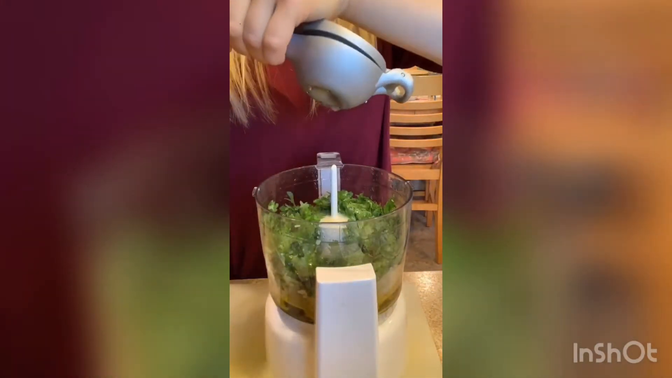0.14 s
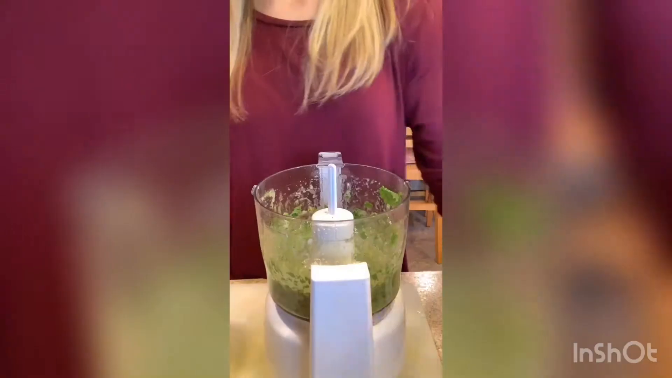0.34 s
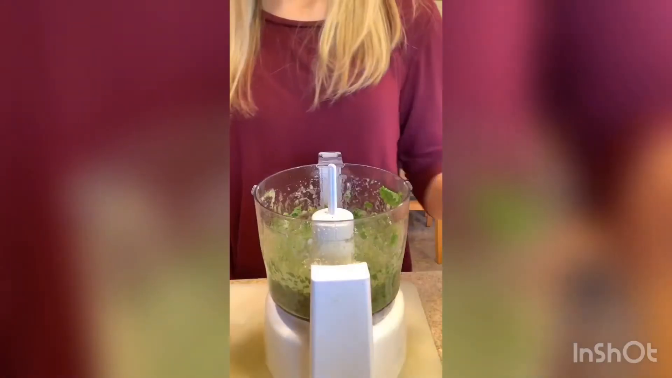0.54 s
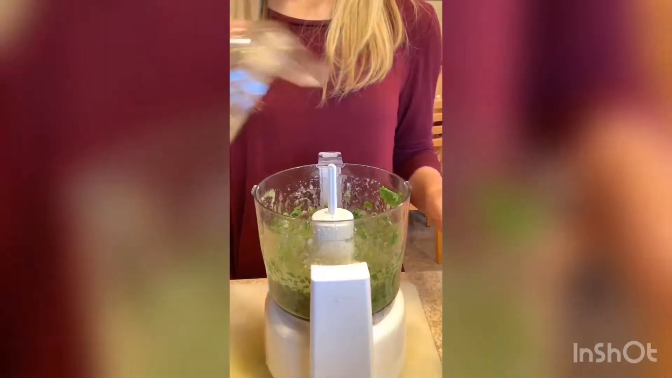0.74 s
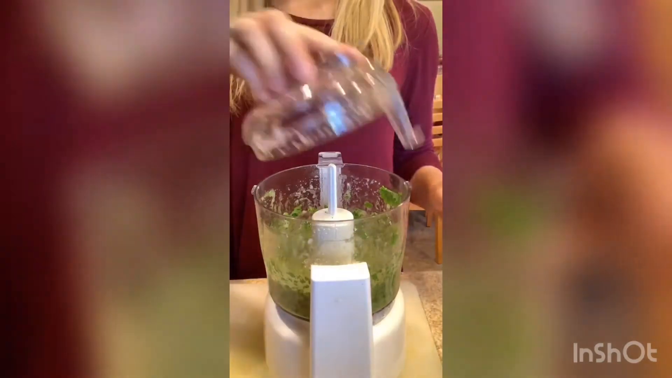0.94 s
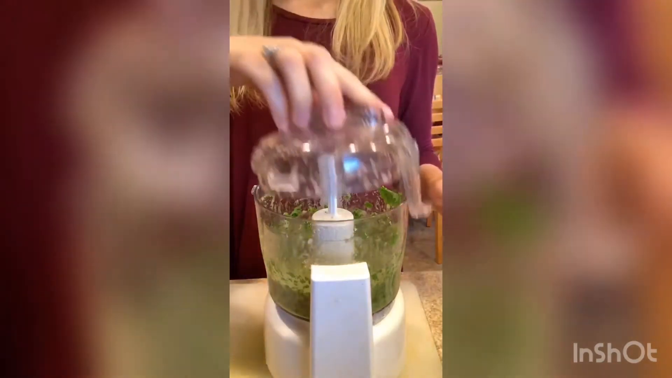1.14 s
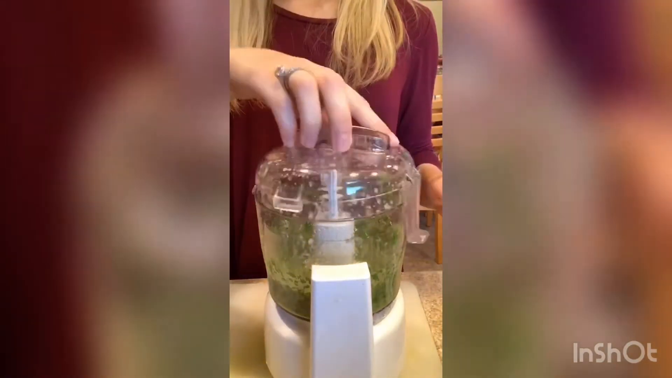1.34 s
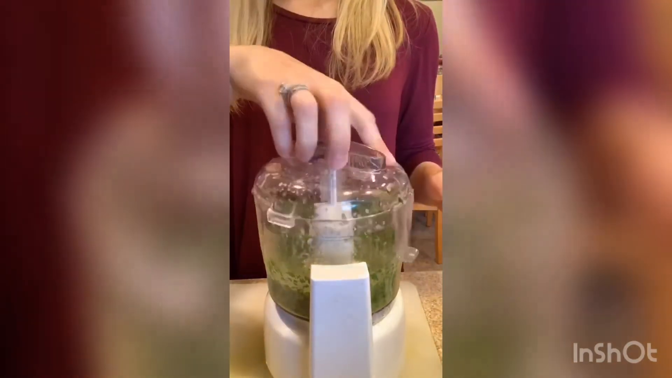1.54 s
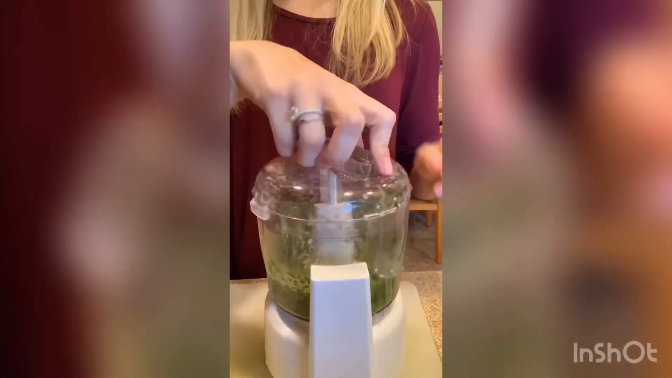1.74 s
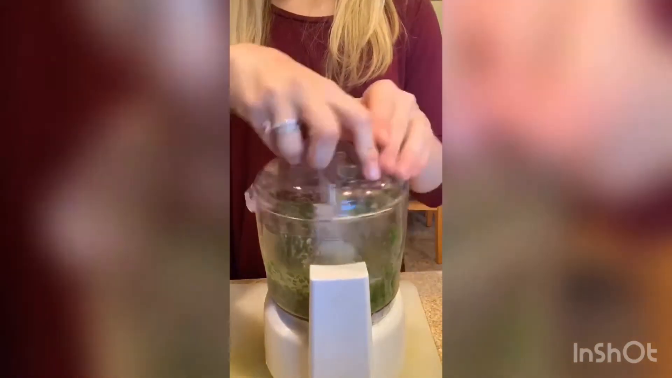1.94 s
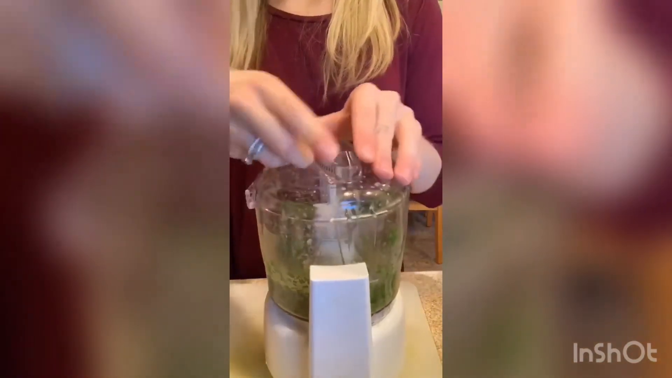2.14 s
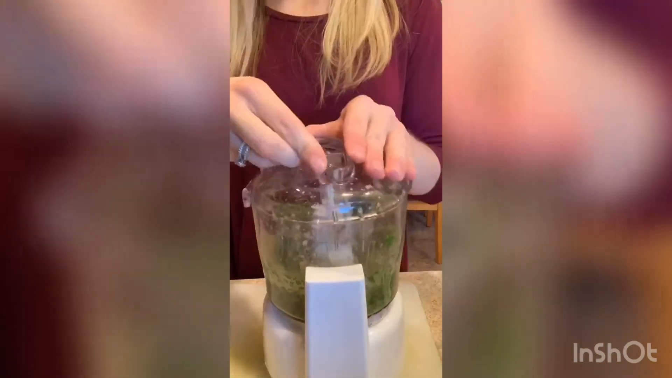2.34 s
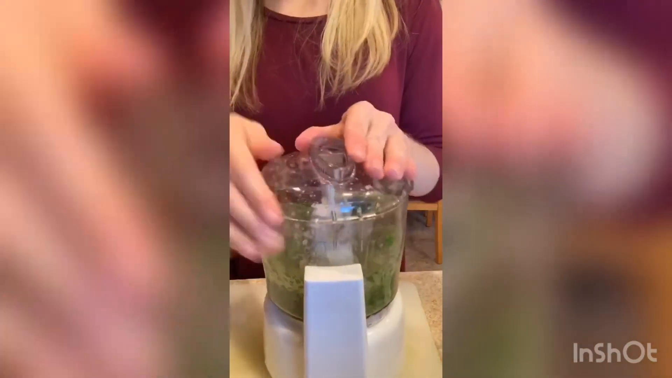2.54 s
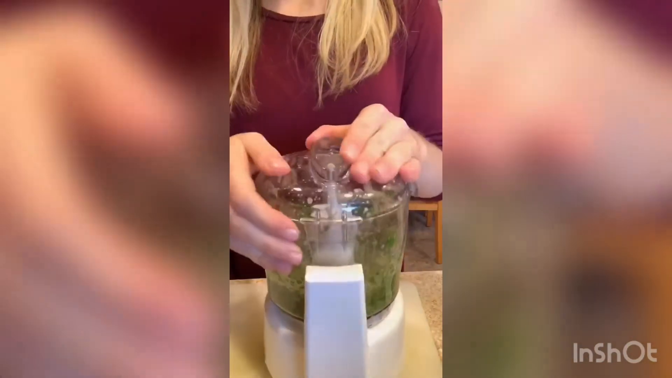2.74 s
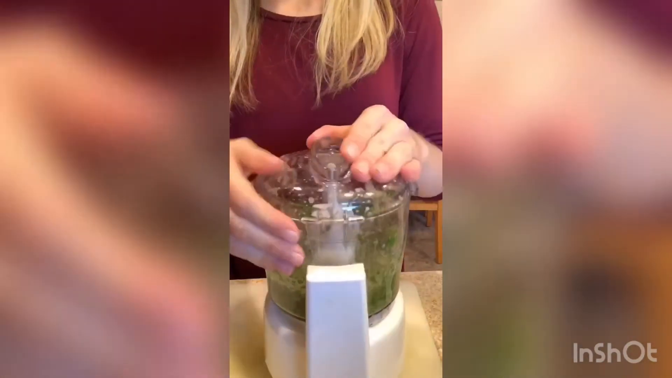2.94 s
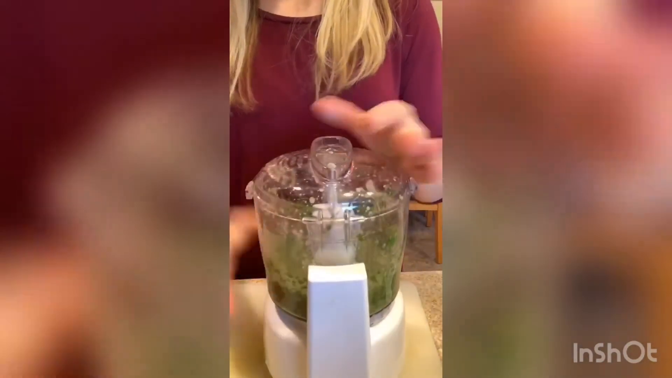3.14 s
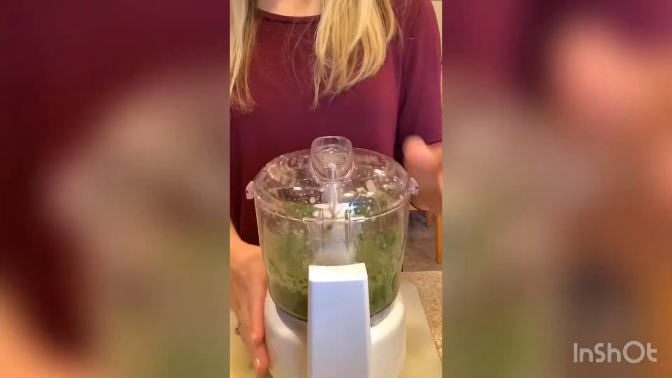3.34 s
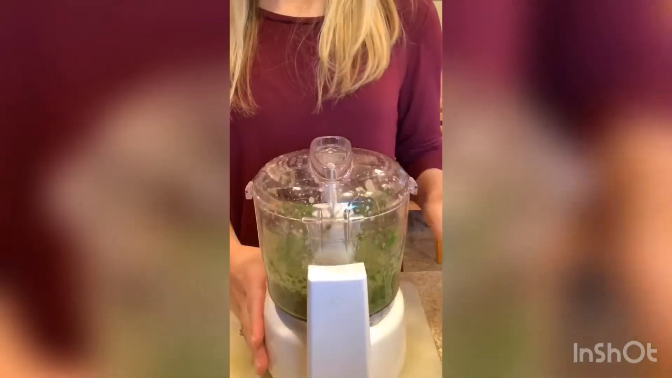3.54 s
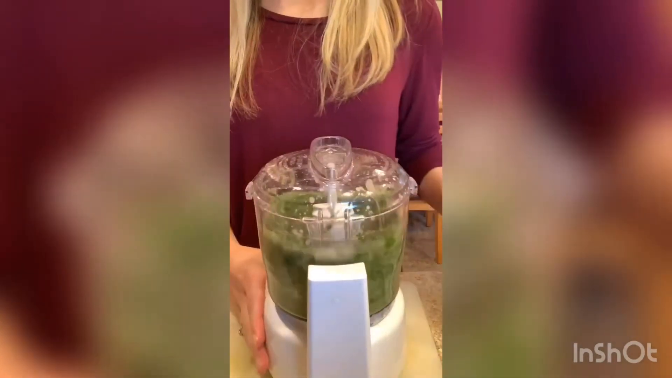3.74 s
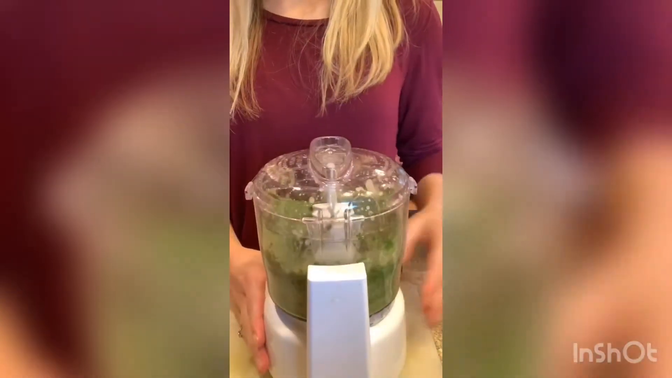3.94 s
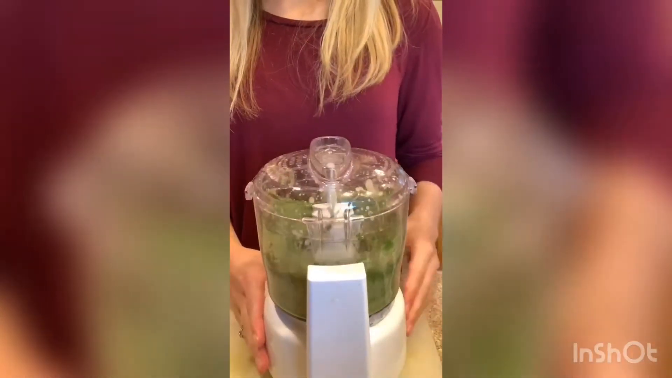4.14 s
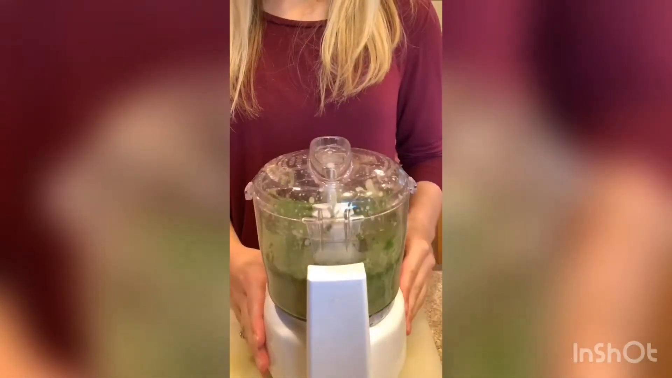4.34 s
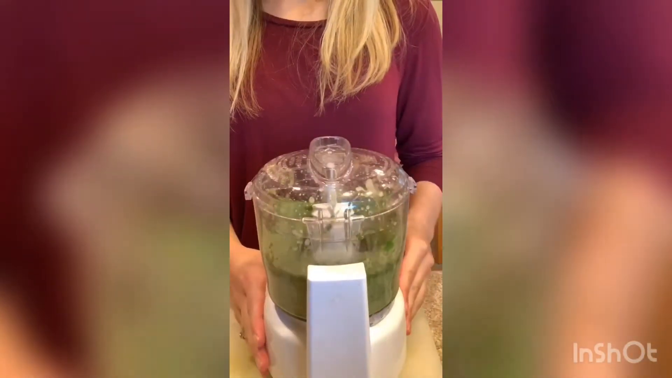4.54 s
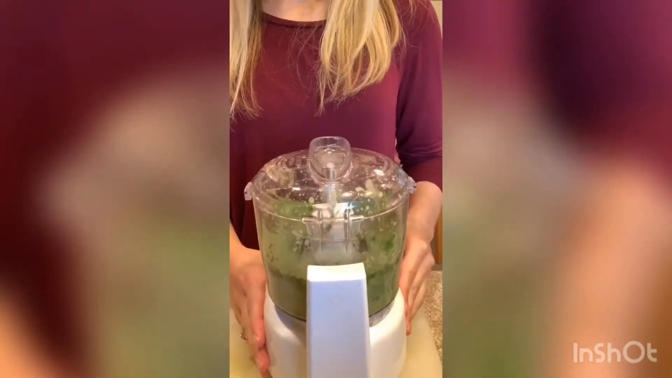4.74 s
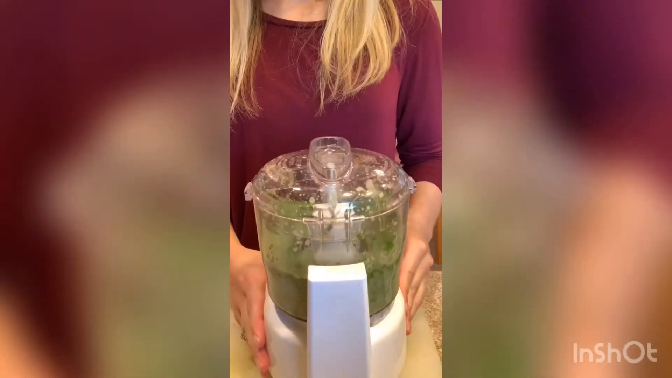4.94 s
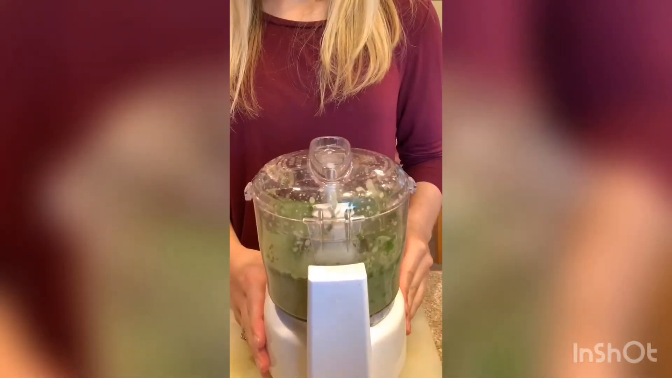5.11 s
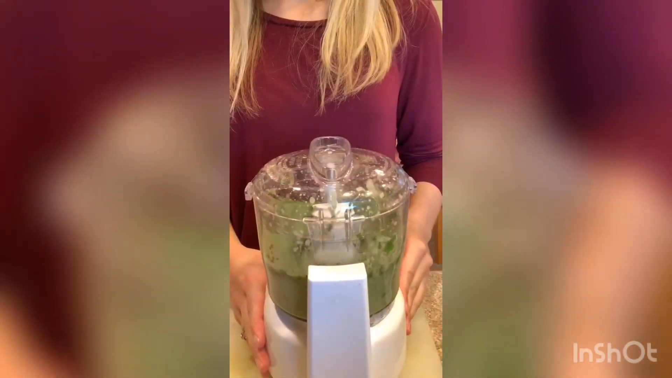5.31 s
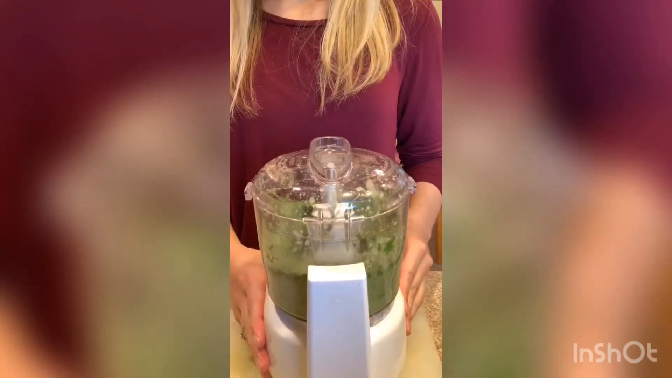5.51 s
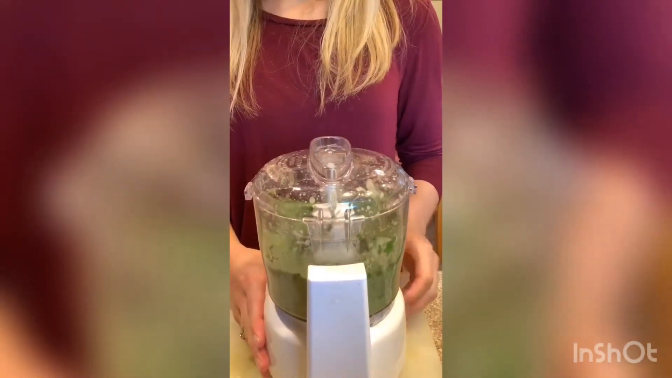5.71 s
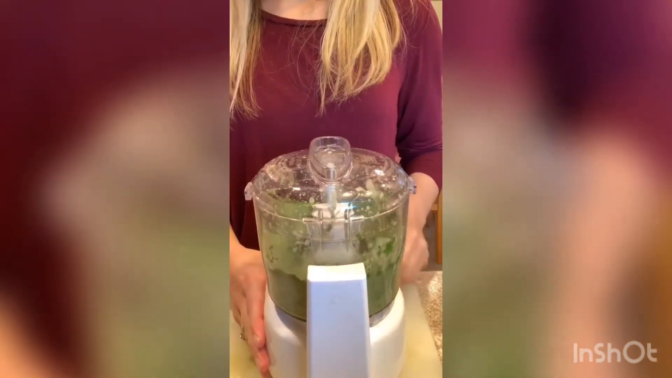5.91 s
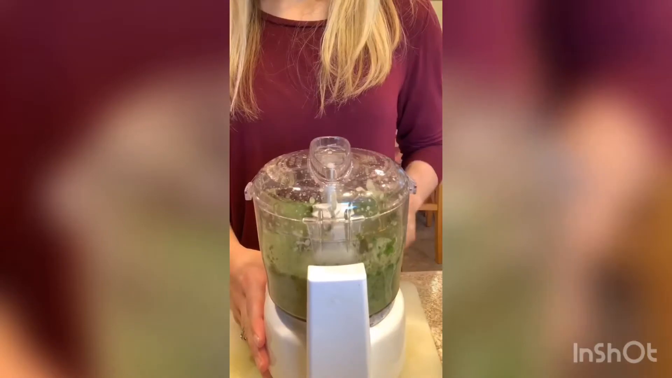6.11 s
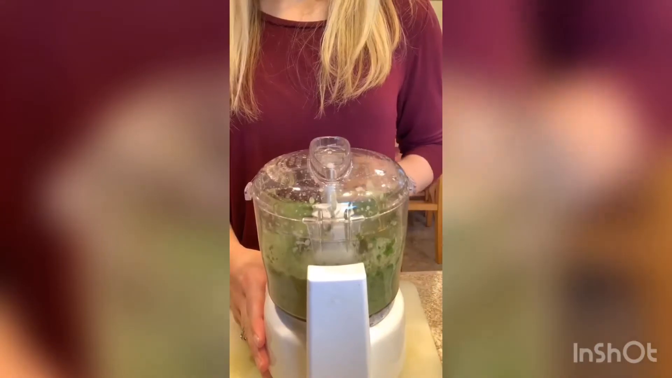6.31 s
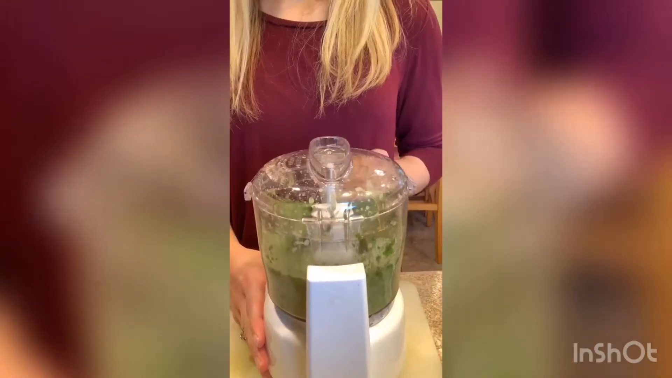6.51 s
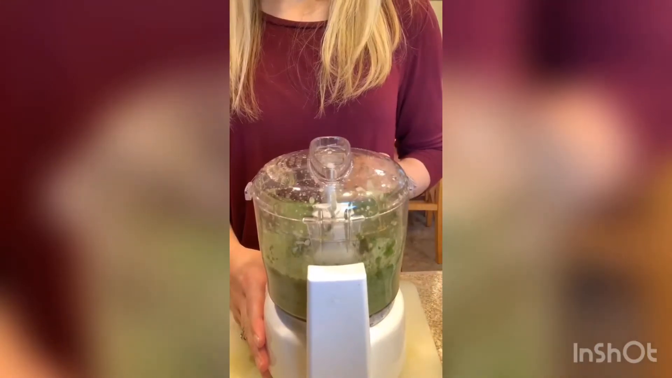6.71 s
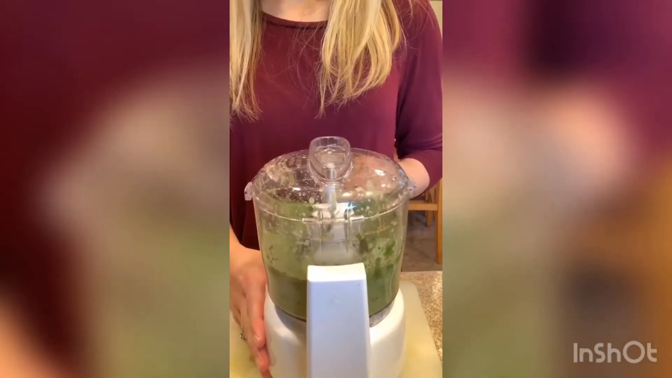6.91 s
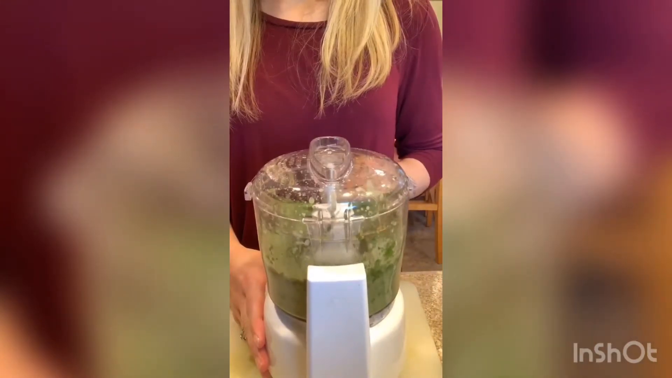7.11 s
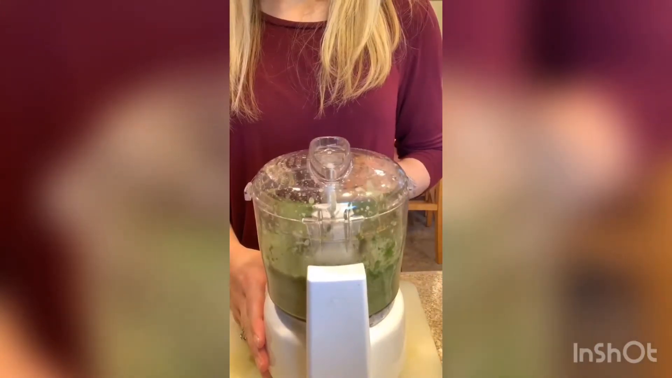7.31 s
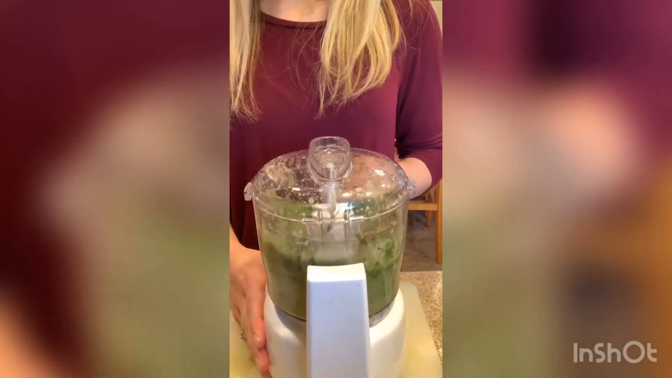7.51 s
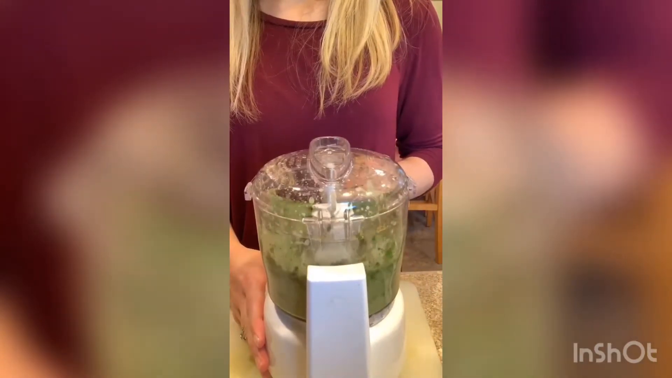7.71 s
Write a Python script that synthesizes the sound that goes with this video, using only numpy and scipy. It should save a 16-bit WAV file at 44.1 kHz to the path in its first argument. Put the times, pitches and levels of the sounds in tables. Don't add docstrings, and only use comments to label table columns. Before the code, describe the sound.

In a quiet, hard-walled kitchen, a plastic lid lands on a food processor bowl with a hollow clatter, then rubs, clicks and is turned until it latches with a loud sharp crack over a low counter thud. A few light ticks follow. The motor then starts abruptly and runs on loudly, with shrill gear whine, humming and a rough chopping roar. Close microphone, slightly compressed sound.

```python
import sys
import numpy as np
from scipy import signal
from scipy.fft import rfft, irfft
from scipy.io import wavfile
from scipy.ndimage import uniform_filter1d

SR = 44100
rng = np.random.default_rng(int(sys.argv[2]) if len(sys.argv) > 2 else 0)


def ratio_of_db(decibels):
    return 10 ** (np.asarray(decibels, float) / 20)


def file_out(sig):
    cols = np.atleast_2d(sig).T
    lim = np.clip(cols, -1, 1)
    pcm = np.round(lim * 32767).astype(np.int16)
    wavfile.write(sys.argv[1], SR, pcm)


N = 342216
TIME = np.arange(N) / SR
FULL_TOOTH_HZ = 3008
SWITCH_S = 3.585


def at_hz(points, hz):
    points = np.array(points)
    return np.interp(np.log(hz + 1), np.log(points[:, 0]), points[:, 1])


def rms_one(x):
    return x / np.sqrt(np.mean(np.abs(x) ** 2) + 1e-20)


def peak_one(x):
    return x / np.abs(x).max()


def drift(hz):
    r = np.exp(-2 * np.pi * hz / SR)
    noise = rng.standard_normal(N + 9000)
    return rms_one(signal.lfilter([1], [1, -2 * r, r * r], noise)[9000:])


def coloured(spectrum, peaks=()):
    hz = np.fft.rfftfreq(N, 1 / SR)
    db = at_hz(spectrum, hz)
    for at, wide, top_db in peaks:
        db = db + top_db / (1 + (2 * (hz - at) / wide) ** 2)
    return rms_one(irfft(rfft(rng.standard_normal(N)) * ratio_of_db(db), N))


def ring(x, hz, t60):
    r, w = ratio_of_db(-60 / (t60 * SR)), 2 * np.pi * hz / SR
    return signal.lfilter([0, np.sin(w)], [1, -2 * r * np.cos(w), r * r], x)


def band(x, low_hz, high_hz):
    return signal.sosfilt(signal.butter(2, [low_hz, high_hz], "band", fs=SR, output="sos"), x)


def air():
    # (frequency [Hz], density [dB per Hz])
    floor = [(12, -38.5), (20, 0.5), (49, 2), (104, -8), (234, -16), (262, -21), (301, -18), (590, -32),
             (897, -28.5), (2750, -40.5), (3840, -40.5), (6010, -45), (16000, -47)]
    # (start [s], length [s], frequency [Hz], level [dB])
    trills = [
        (.352, .13, 4700, -68),
        (.7, 0.38, 4320, -77),
        (1.15, .08, 4330, -78),
    ]
    break_s, break_length_s, break_db, edge_s = .305, .047, -45, .007
    air_db, early_db = -47, 2.5
    gap = np.minimum(TIME - break_s, break_s + break_length_s - TIME) / edge_s
    gap = np.clip(gap, 0, 1)
    out = coloured(floor) * ratio_of_db(air_db + early_db * (TIME < break_s) + break_db * gap)
    for s, length, hz, db in trills:
        on = np.clip(np.minimum(TIME - s, (s + length - TIME) / 3) / .01, 0, 1)
        out += on * ratio_of_db(db + 3.9 * drift(60)) * np.sin(2 * np.pi * hz * TIME + 1.1 * drift(40))
    return out


def knocks():
    # (frequency [Hz], level [dB], t60 [s])
    lid_modes = [(1040, -24.5, 0.98), (1360, -6, 0.23), (1794, -1.5, 0.036), (2170, -12.5, 0.11),
                 (2830, -10.5, 0.27), (2920, -21, 0.19), (3490, -10.5, 0.15), (4030, -17.5, 0.29),
                 (4156, -32, 0.13), (5100, -17, 0.13)]
    # (frequency [Hz], level [dB], t60 [s])
    base_modes = [(194, 4, 0.16), (233, 7, 0.089), (330, 3, 0.11)]
    # (time [s], peak [dB], strongest ring [Hz], crack [dB], rattle t60 [s])
    landings = [
        (1.312, -25.5, 1060, -41, 0.023),
        (1.428, -31, 1070, -42, .02),
        (1.451, -11, 1770, -25, 0.035),
        (1.458, -17.5, 1180, -32, 0.047),
        (1.481, -21, 1270, -40, 0.055),
        (1.589, -51, 1100, -55, 0.046),
        (1.929, -52, 1410, -52, 0.027),
        (1.948, -33.5, 1360, -40, .06),
        (2.365, -31.5, 1090, -45, .028),
        (2.388, -42.5, 1510, -52, 0.011),
    ]
    # (time [s], peak
    # [dB], strongest ring [Hz], crack [dB], rattle t60 [s])
    clicks = [(0.969, -50.5, 2950, -67, 0.022), (1.301, -21.5, 545, -35, 0.034),
              (1.306, -14.5, 507, -28, 0.093), (1.39, -26.5, 1420, -47, 0.013),
              (1.414, -24.5, 1420, -37, 0.046), (1.723, -38, 1440, -52, .045),
              (1.975, -11.5, 1860, -8.5, .05), (2.167, -62, 1390, -53, .03), (2.311, -40, 1500, -50, 0.033),
              (2.345, -45, 1540, -45.5, 0.036), (2.355, -28, 3420, -33.5, 0.037),
              (2.578, -35.5, 1030, -44, 0.031), (2.596, -32, 786, -42, 0.013),
              (2.602, -9, 2400, -11, 0.029), (2.609, -15.5, 1500, -33.5, .03),
              (2.624, -12.5, 2430, -23, 0.02), (2.67, 7.5, 1636, 5, 0.01), (2.954, -45, 1070, -59, 0.021),
              (3.018, -20.5, 2590, -32, 0.027), (3.025, -32.5, 1540, -49.5, .04),
              (3.042, -30.5, 1520, -53, 0.039), (3.091, -36, 1080, -59.5, .03)]
    # (thump at a full-scale peak [dB], share of the peak it follows [0-1])
    landing_weight = (-17, 0.47)
    click_weight = (-37, .45)
    hollow_cycles, hollow_db = 60, -14
    size = 7000
    out = np.zeros((2, N + size))
    age = np.arange(size) / SR
    click = 1. * (age == 0)
    contacts = [(row, landing_weight) for row in landings] + [(row, click_weight) for row in clicks]
    for (s, peak_db, hz, crack_db, t60), (weight_db, follows) in contacts:
        thump_db = weight_db + follows * peak_db
        decay_s = max(t60, .005)
        grit = rng.standard_normal(size) * np.minimum(age / 0.00041, 1)
        grit[12] = 5
        rattle = grit * ratio_of_db(-60 * age / decay_s)

        spread_db = rng.normal(0, 3, len(lid_modes))
        modes = sum(ratio_of_db(db + d) * ring(rattle, f, .17 * t) for (f, db, t), d in zip(lid_modes, spread_db))
        body = ratio_of_db(-8) * peak_one(modes)
        body += peak_one(band(rattle, hz / 1.4, hz * 1.4))
        body += ratio_of_db(-1.5) * peak_one(band(rattle, 500, 4800))
        body += ratio_of_db(hollow_db) * peak_one(ring(rattle, hz, hollow_cycles / hz))
        thump = band(sum(ratio_of_db(db) * ring(rattle, f, t) for f, db, t in base_modes), 45, 600)
        crack = band(grit * ratio_of_db(-120 * age / decay_s), 2800, 10500)

        far_body = band(click, hz / 1.5, hz * 1.5) + .8 * band(click, 400, 5000)
        far_crack = band(click, 3000, 12000)
        at = round(s * SR)
        for part, far, db in ((body, far_body, peak_db + 7), (thump, thump, thump_db + 9.5),
                              (crack, far_crack, crack_db + 9.5)):
            near = ratio_of_db(db) * peak_one(part)
            out[0, at:at + size] += near
            out[1, at:at + size] += rms_one(far) * np.std(near)
    return out[:, :N]


def kitchen(x):
    # (frequency [Hz], t60 [s])
    decay = [(100, 0.94), (500, 0.49), (2000, 0.54), (5000, 0.45), (12000, 0.26)]
    age = np.arange(SR) / SR
    tail = 0
    for hz in 63 * 2 ** np.arange(0, 8.1, .5):
        noise = band(rng.standard_normal(SR), hz / 2 ** .25, hz * 2 ** .25)
        tail = tail + noise * ratio_of_db(-60 * age / at_hz(decay, hz))
    tail *= np.clip(age / 0.018, 0, 1)
    return signal.fftconvolve(x, tail / np.sqrt(np.sum(tail ** 2)))[:N]


def thuds():
    # (time [s], level [dB], frequency [Hz], t60 [s])
    pushes = [
        (1.31, -26, 60, 0.23),
        (2.361, -31.5, 69.5, 0.33),
        (2.599, -24.5, 66, 0.42),
        (2.68, -19, 69, 0.2),
    ]
    out = np.zeros(N)
    for s, db, hz, t60 in pushes:
        age = np.maximum(TIME - s, 0)
        swell = np.minimum(age / .015, 1)
        out += ratio_of_db(db - 60 * age / t60) * swell * np.sin(2 * np.pi * hz * age)
    return out


def rubs():
    # (middle [s], length [s], dull level [dB], bright level [dB])
    strokes = [(1.41, 0.03, -28.5, -36.5), (1.466, 0.064, -29, -51), (1.61, 0.046, -50.5, -55),
               (1.743, 0.09, -46.5, -53.5), (1.961, 0.075, -44.5, -52), (2, 0.057, -40, -58),
               (2.253, 0.041, -51, -64), (2.319, 0.043, -37.5, -56), (2.405, 0.086, -45.5, -60.5),
               (2.447, 0.032, -39.5, -37.5), (2.619, 0.053, -31, -39), (2.959, .02, -46, -73),
               (3.092, 0.022, -40, -73)]
    grit = rng.standard_normal(N) * ratio_of_db(3 * drift(120))
    dull = rms_one(band(grit, 450, 2800))
    bright = rms_one(band(grit, 2800, 6500) - .5 * band(grit, 6500, 15000))
    out = np.zeros(N)
    for s, length, dull_db, bright_db in strokes:
        stroke = np.clip(1 - (1.7 * (TIME - s) / length) ** 2, 0, 1)
        out += stroke * (ratio_of_db(dull_db) * dull + ratio_of_db(bright_db) * bright)
    return out


def controls():
    spin_from_s, spin_s = 3.562, .146
    thin_from_s, thin_hz_per_s = 7.1, 76
    on = np.maximum(TIME - SWITCH_S, 1e-4)
    short = 1 - np.tanh(np.maximum(TIME - spin_from_s, 0) / spin_s)
    tooth_hz = FULL_TOOTH_HZ * (1 - short) + thin_hz_per_s * np.maximum(TIME - thin_from_s, 0)
    load = np.exp(-on / 1)

    def rise_db(rise_s):
        return 20 * np.log10(np.tanh((on / rise_s) ** 2))

    whine_db = -15.5 + 4 * load - 11 * short
    roar_db = -23.5 + 1.5 * load + rise_db(.044)
    mains_db = -31.5 + 7 * load + 10 * np.sqrt(short) + rise_db(.062)
    rotor_db = -22.5 + 3 * load - 93 * short
    return tooth_hz, whine_db, roar_db, mains_db, rotor_db


def motor():
    # (multiple of tooth rate [1], level [dB], wobble [Hz], steady share [0-1],
    # blade throb [0-1], rotor throb [0-1])
    mesh = [(.155, -15.5, 6.8, 0.36, 0, 0.5), (.47, -25, 64, .1, 1, 0), (.955, 0.5, 117, 0.03, 0, 0.08),
            (1.05, -0.5, 170, 0, 0, 0.1), (1.94, -3.5, 92, 0.49, 0.64, .1), (2.004, -3, 104, .2, 0.64, 0),
            (3, -3, 155, 0.18, 0, 0.38)]
    # (rotor [dB], blade [dB], mains double [dB], mains fourfold [dB])
    hum_levels = (1.5, -9.5, 2.5, -5.5)
    # (frequency [Hz], density [dB per Hz])
    roar_spectrum = [(18, -47), (30, -31.5), (194, -9), (311, -17), (461, -20.5), (844, -13.5), (1540, 0.5),
                     (1860, -11), (2900, -12), (4190, -12.5), (5900, -14.5), (6550, -13.5), (9220, -17.5),
                     (12300, -14), (16000, -25)]
    # (frequency [Hz], width [Hz], level [dB])
    housing = [(92, 32, 13), (182.5, 7.3, 12.5), (236, 93, 13.5), (482, 165, 15.5), (1510, 1600, -8),
               (1527, 9.5, 7.5), (3270, 420, 7), (3700, 98, 5.5), (3890, 90, 6.5), (5820, 160, 11.5),
               (8930, 160, 4.5), (4550, 140, 3.5), (5000, 120, 5.5), (7200, 280, 0.5), (7940, 200, 4),
               (10600, 100, 8), (12400, 350, -1)]
    teeth, blade_share, mains_hz = 16, .2765, 60
    odd_order_speed_db = 5
    tooth_hz, whine_db, roar_db, mains_db, rotor_db = controls()
    tooth = 2 * np.pi * np.cumsum(tooth_hz * (1 + 0.002093 * drift(7.07))) / SR
    rotor = tooth / teeth
    blade = rotor * blade_share

    lag = 1 - tooth_hz / FULL_TOOTH_HZ
    light = .5 * np.clip(5 * lag, 0, 1)
    whine = 0
    for k, db, wobble_hz, steady, blade_throb, rotor_throb in mesh:
        steady = steady + (1 - steady) * light
        loose = (1 - steady) / np.sqrt(2)
        throb = (1 + blade_throb * np.cos(blade + k)) * (1 + rotor_throb * np.cos(rotor))
        wobbly = (steady + loose * drift(wobble_hz)) * np.cos(k * tooth)
        wobbly += loose * drift(wobble_hz) * np.sin(k * tooth)
        odd = round(k) % 2
        whine = whine + ratio_of_db(db - odd_order_speed_db * odd * np.maximum(lag, 0)) * throb * wobbly

    mains = 2 * np.pi * mains_hz * TIME
    phases = (rotor, blade, 2 * mains, 4 * mains)
    loads = (rotor_db, roar_db, mains_db, mains_db)
    hum = 0
    for db, load, phase in zip(hum_levels, loads, phases):
        hum = hum + ratio_of_db(db + load + 1.8 * drift(9)) * np.sin(phase + .45 * drift(8))

    roar = coloured(roar_spectrum, housing) * ratio_of_db(.5 * drift(40)) * (1 + .12 * np.cos(blade))
    running = np.clip((TIME - SWITCH_S) / .01, 0, 1)
    whine_rise = np.clip((TIME - SWITCH_S) / .044, 0, 1)
    return running * (whine_rise * ratio_of_db(whine_db) * whine + ratio_of_db(roar_db + 8.5) * roar + hum)


def scene():
    lid, sent = knocks() + rubs()
    machine = motor()
    walls = kitchen(ratio_of_db(-17.5) * sent + ratio_of_db(-10.0) * machine)
    return (lid + thuds() + machine + walls + air())[None]


def treble_dropouts(x, size=2048, count=14):
    # (frequency [Hz], share of time [0-1])
    emptied = [(3000, .012), (9000, .025), (10000, .07), (11500, .02), (12500, .08), (13300, .42),
               (14000, .3), (14600, .5), (15200, .4), (15600, .6), (15750, 1.01)]
    overlap = size * 3 // 4
    hz, _, frames = signal.stft(x, SR, nperseg=size, noverlap=overlap)
    luck = rng.standard_normal((len(hz) // count + 1, frames.shape[-1]))
    luck = rms_one(uniform_filter1d(luck, size=8, axis=1))
    rank = np.argsort(np.argsort(luck, axis=1), axis=1) / luck.shape[1]
    rank = np.repeat(rank, count, axis=0)[:len(hz)]
    share = at_hz(emptied, hz)[:, None] * (hz[:, None] > 3000)
    power = np.sum(np.abs(frames[0]) ** 2, axis=0)
    loud = uniform_filter1d(power, size=60) > .005
    kept = 1 - loud * (rank < share)
    return signal.istft(frames * kept, SR, nperseg=size, noverlap=overlap)[1][:, :N]


def band_limit(x):
    return signal.sosfilt(signal.butter(12, 16330, fs=SR, output="sos"), x)


def record(dry):
    rounded = 1.005 * np.tanh(dry / 1.198)
    heard = signal.sosfilt(signal.butter(2, 32, "high", fs=SR, output="sos"), rounded)
    heard = signal.sosfilt(signal.cheby2(12, 40, 16300, fs=SR, output="sos"), heard)
    mix = treble_dropouts(heard)
    return band_limit(mix)


dry = scene()
out = record(dry)
file_out(out)
```